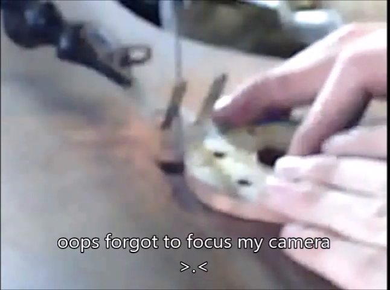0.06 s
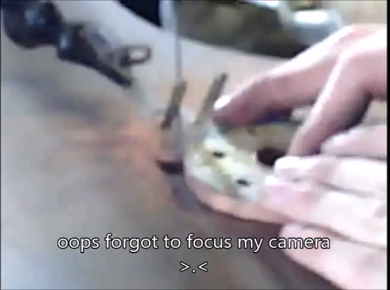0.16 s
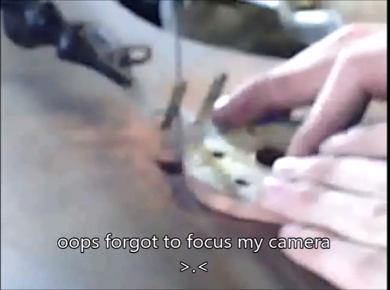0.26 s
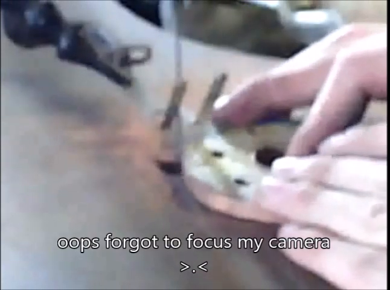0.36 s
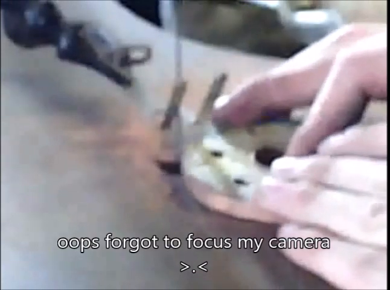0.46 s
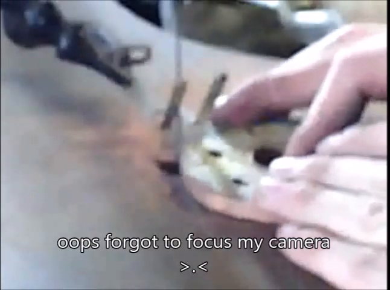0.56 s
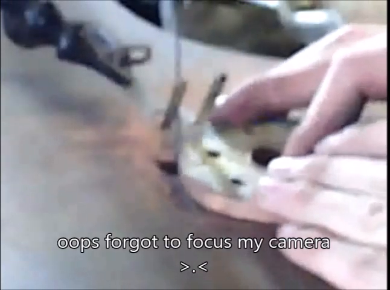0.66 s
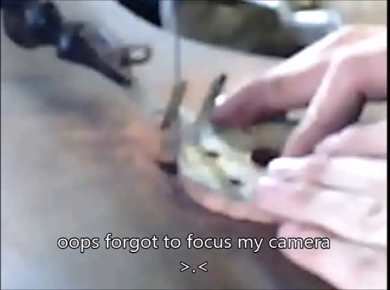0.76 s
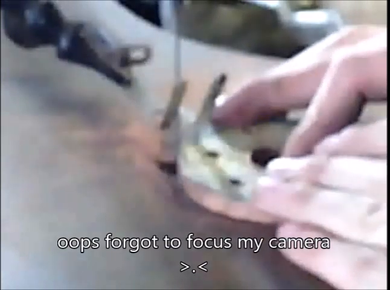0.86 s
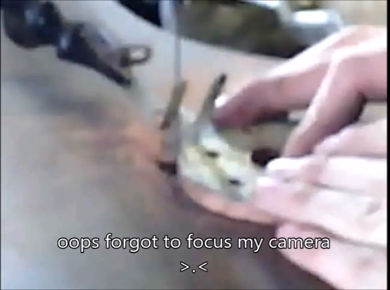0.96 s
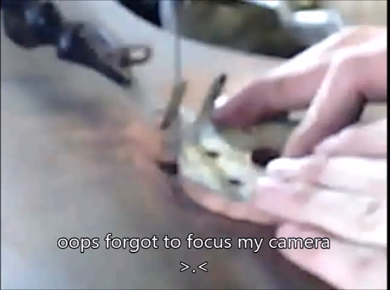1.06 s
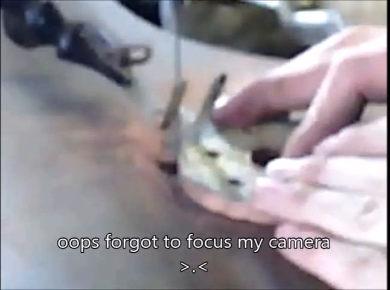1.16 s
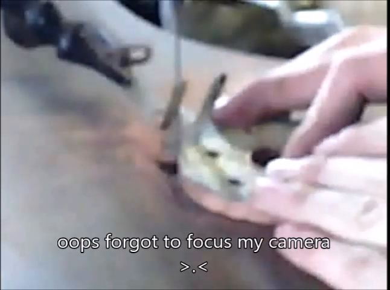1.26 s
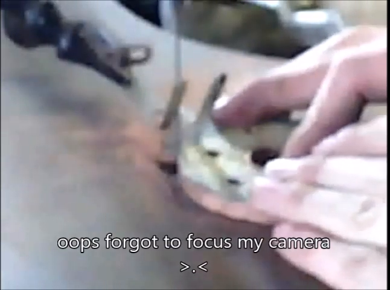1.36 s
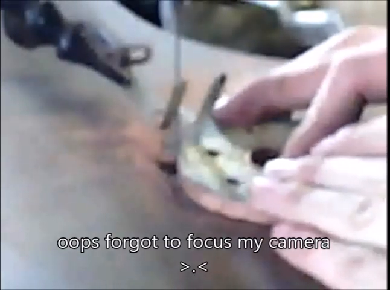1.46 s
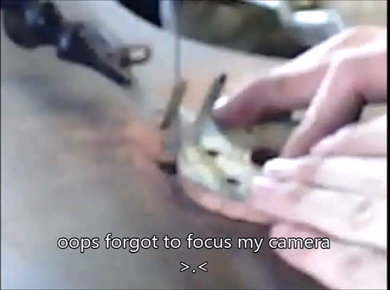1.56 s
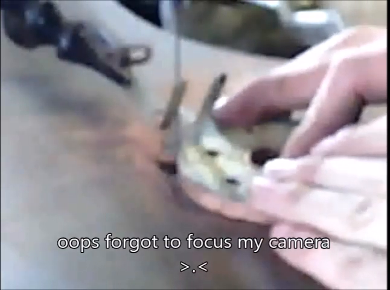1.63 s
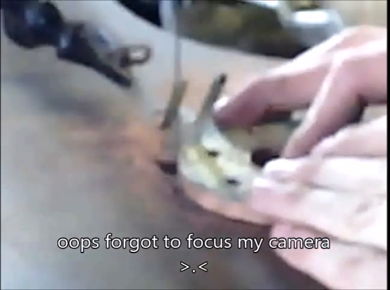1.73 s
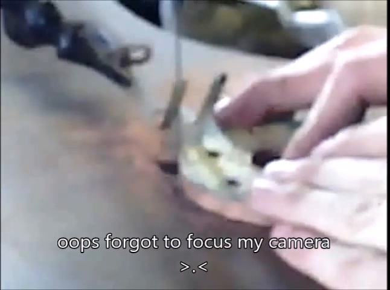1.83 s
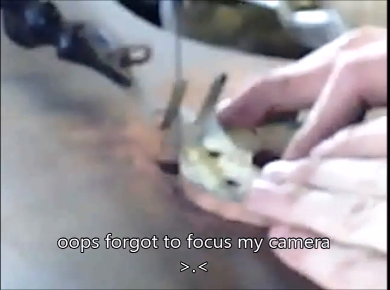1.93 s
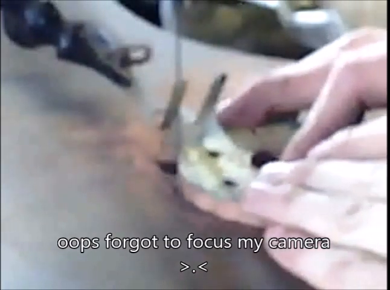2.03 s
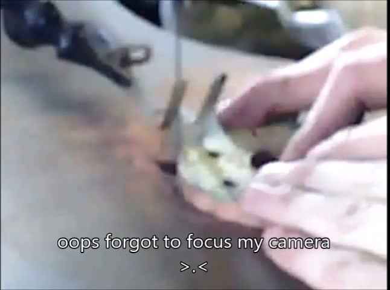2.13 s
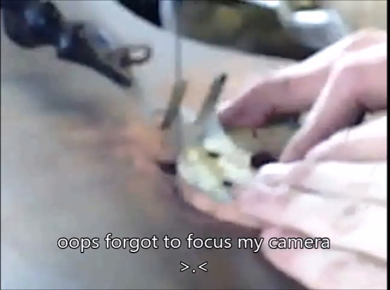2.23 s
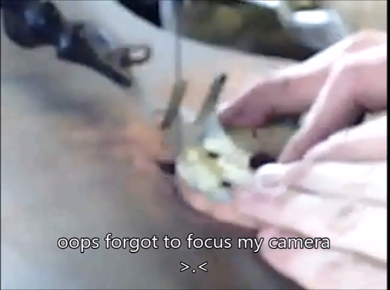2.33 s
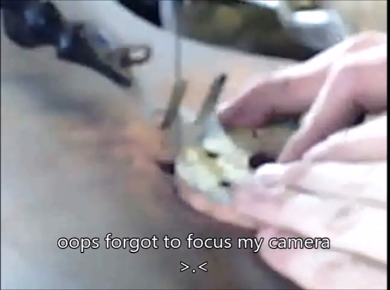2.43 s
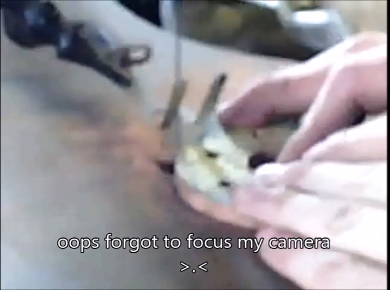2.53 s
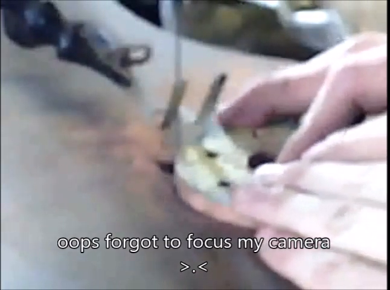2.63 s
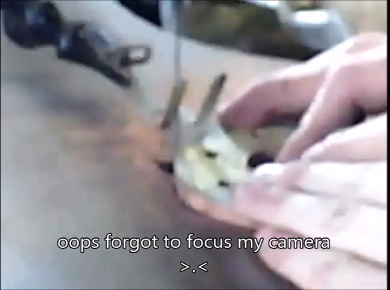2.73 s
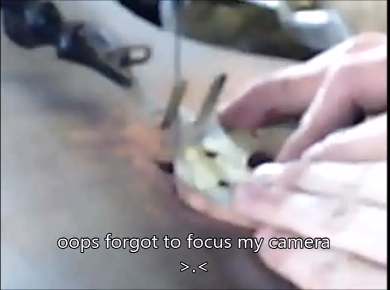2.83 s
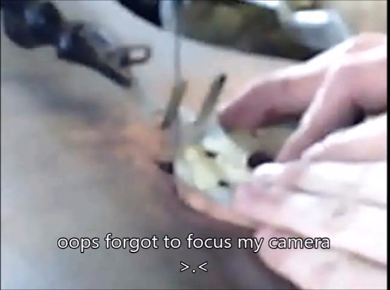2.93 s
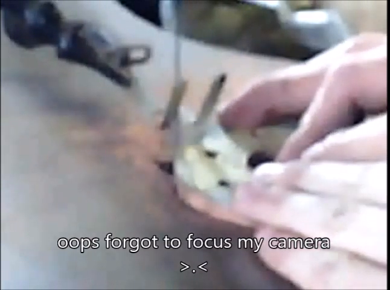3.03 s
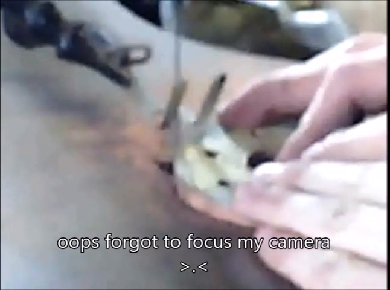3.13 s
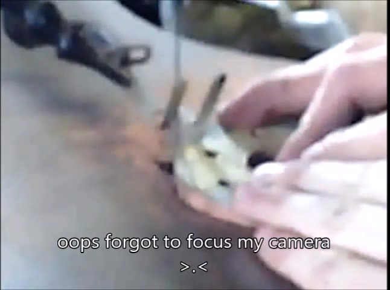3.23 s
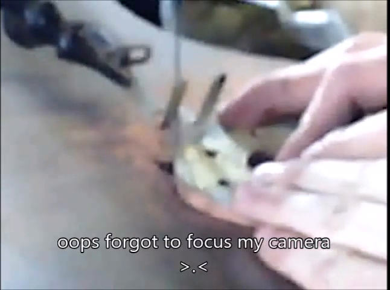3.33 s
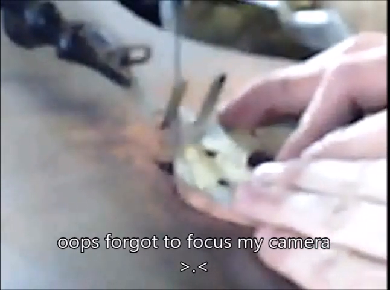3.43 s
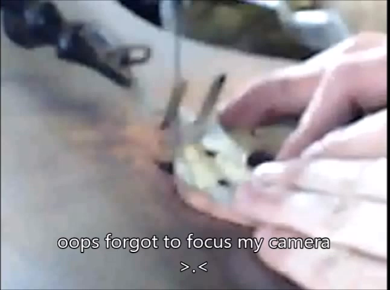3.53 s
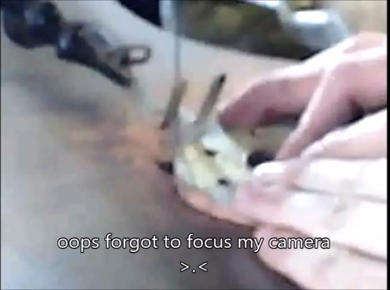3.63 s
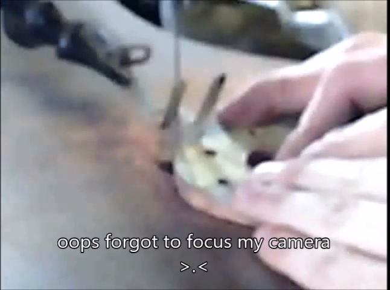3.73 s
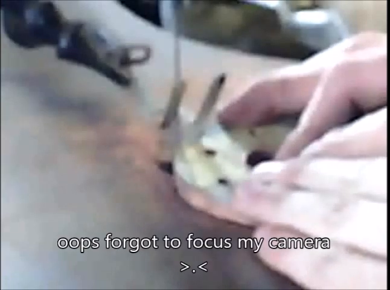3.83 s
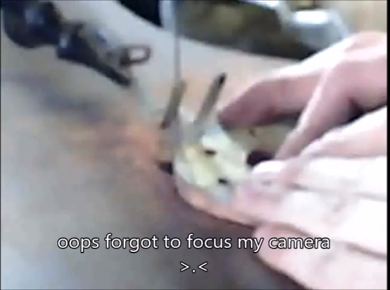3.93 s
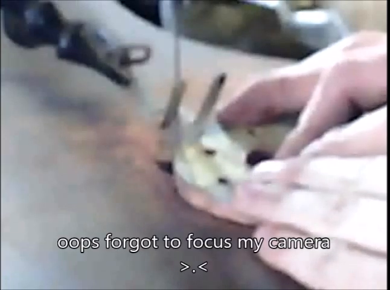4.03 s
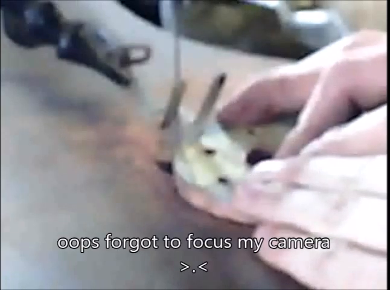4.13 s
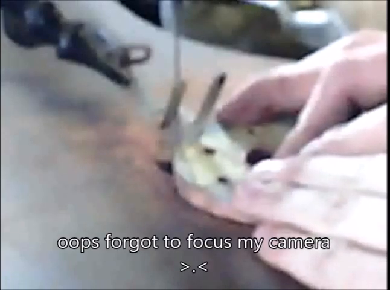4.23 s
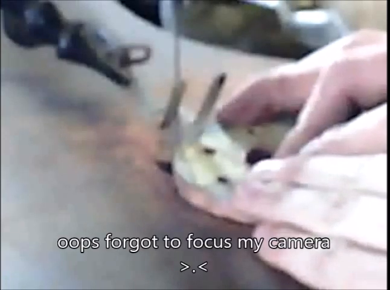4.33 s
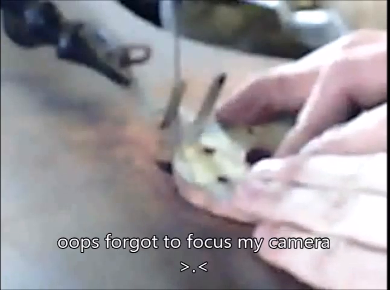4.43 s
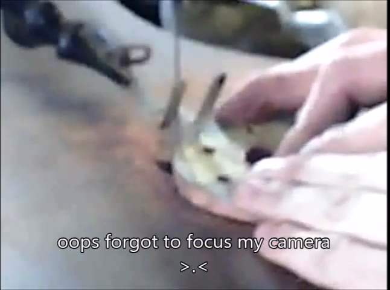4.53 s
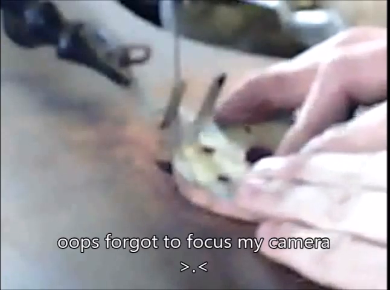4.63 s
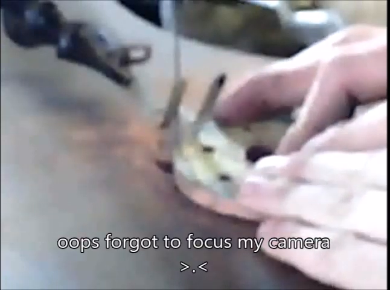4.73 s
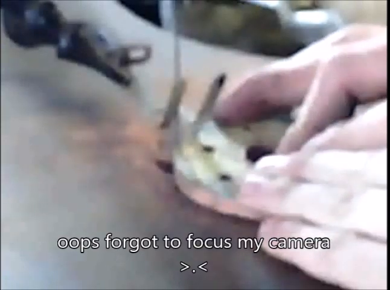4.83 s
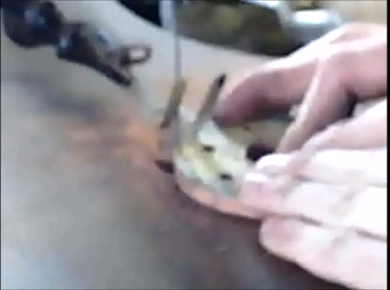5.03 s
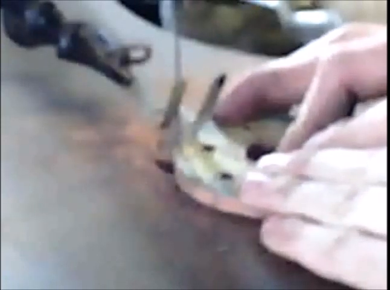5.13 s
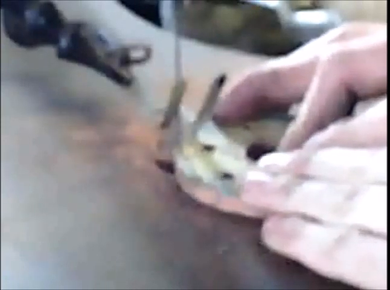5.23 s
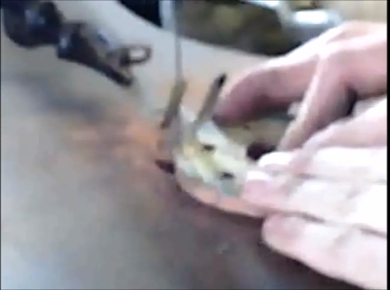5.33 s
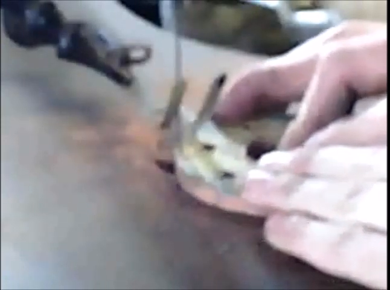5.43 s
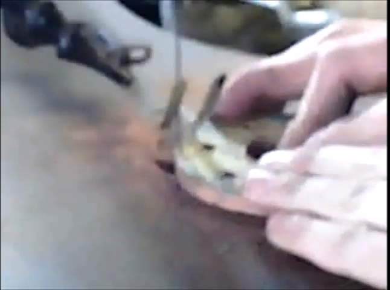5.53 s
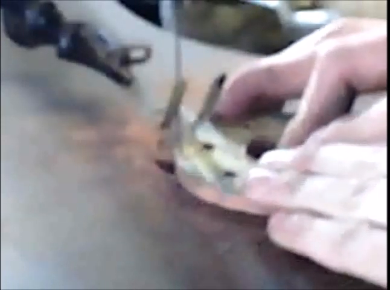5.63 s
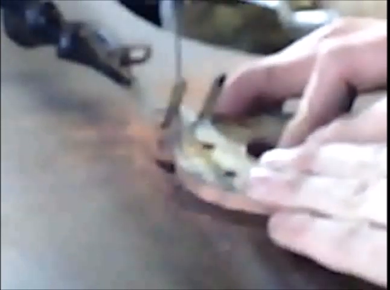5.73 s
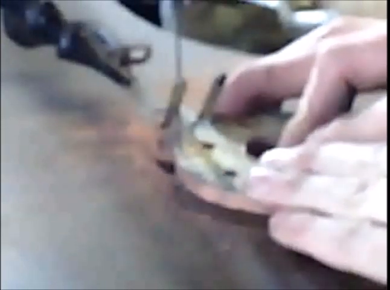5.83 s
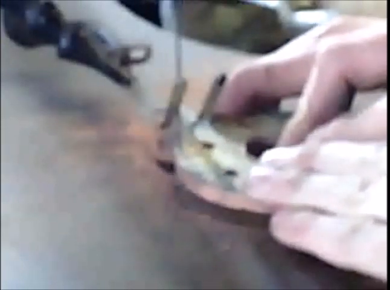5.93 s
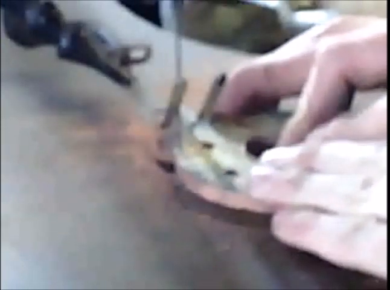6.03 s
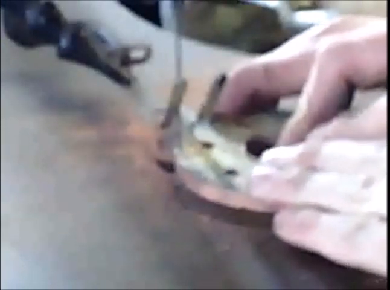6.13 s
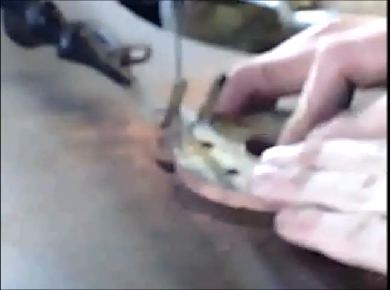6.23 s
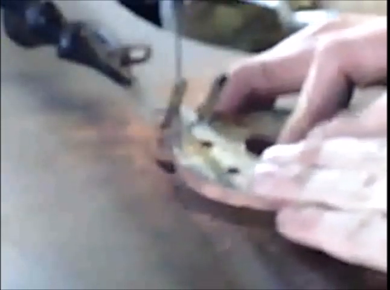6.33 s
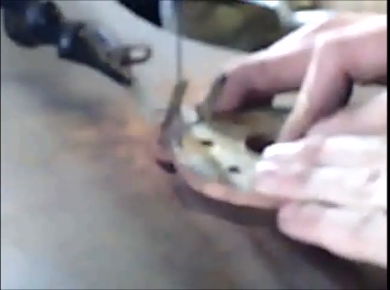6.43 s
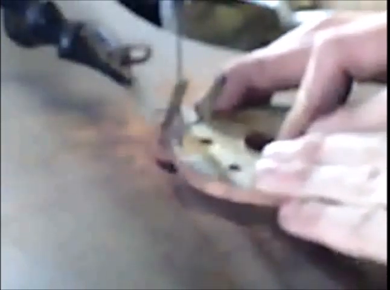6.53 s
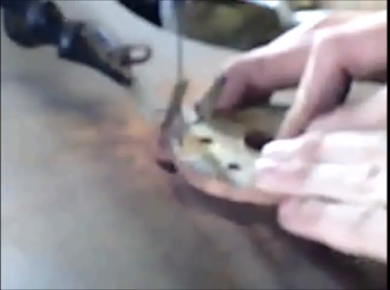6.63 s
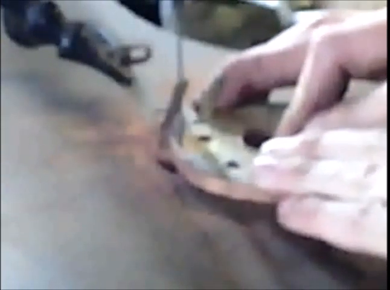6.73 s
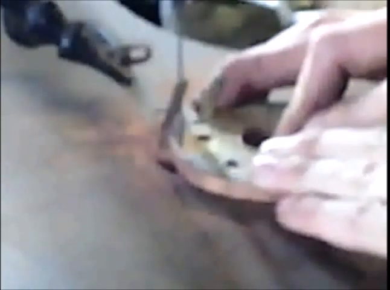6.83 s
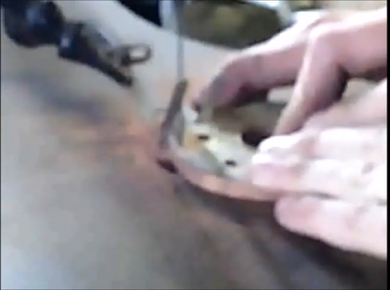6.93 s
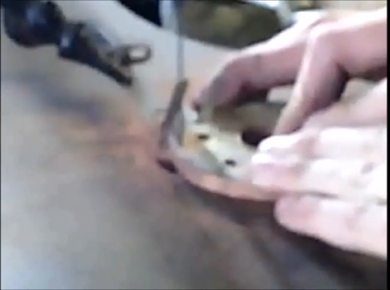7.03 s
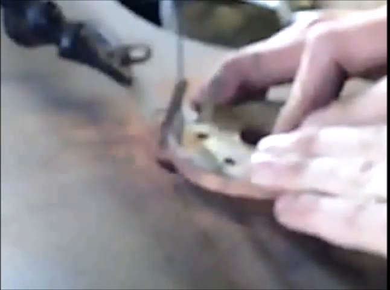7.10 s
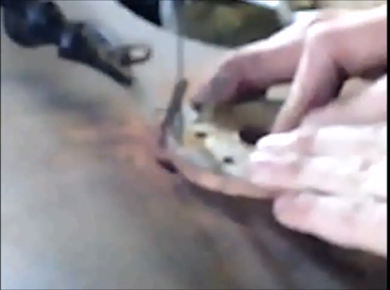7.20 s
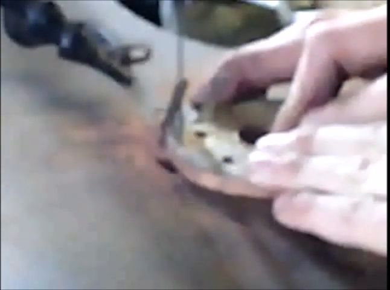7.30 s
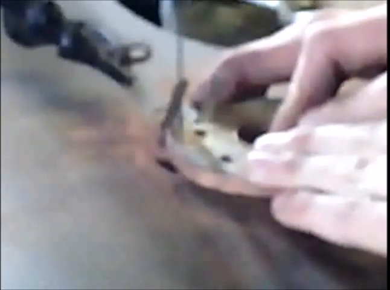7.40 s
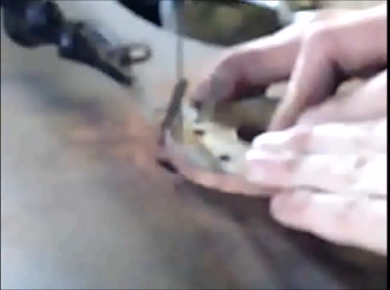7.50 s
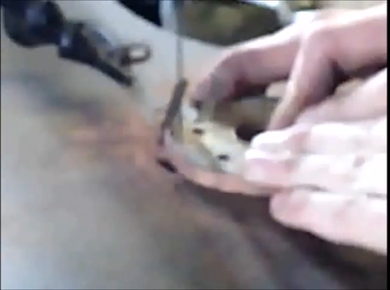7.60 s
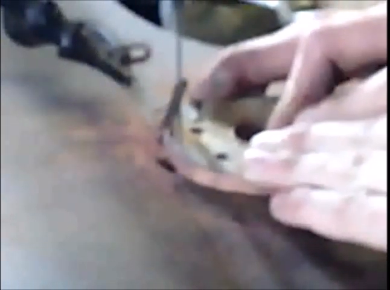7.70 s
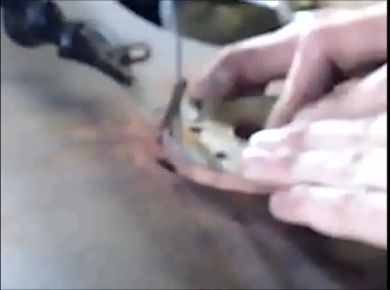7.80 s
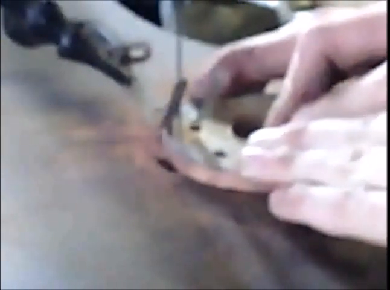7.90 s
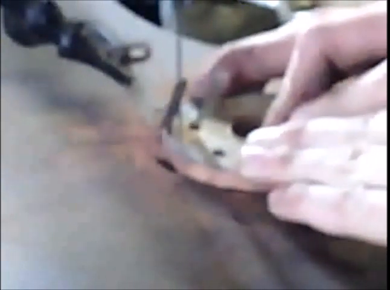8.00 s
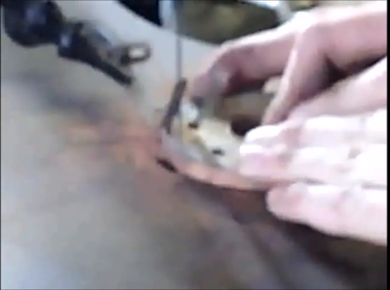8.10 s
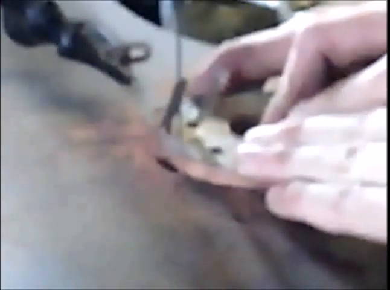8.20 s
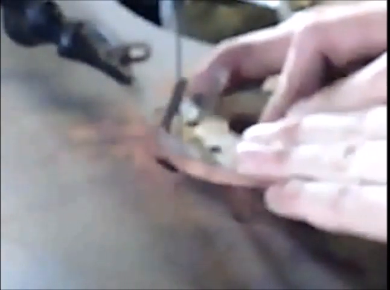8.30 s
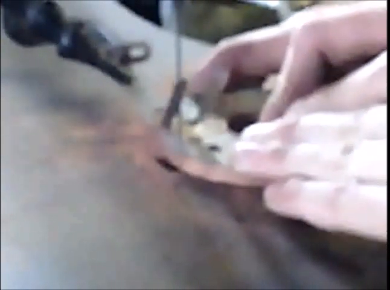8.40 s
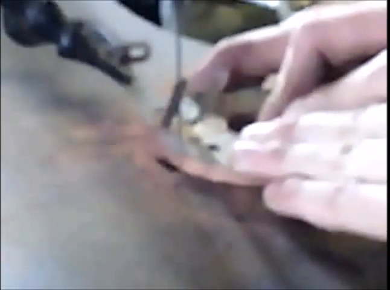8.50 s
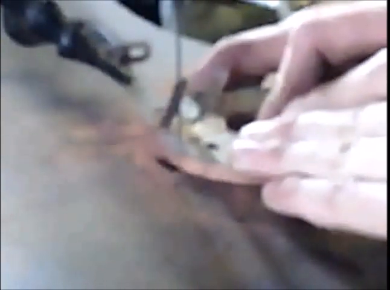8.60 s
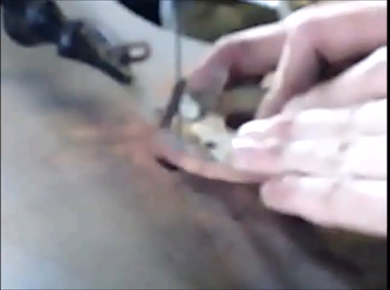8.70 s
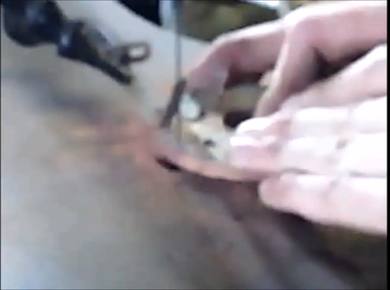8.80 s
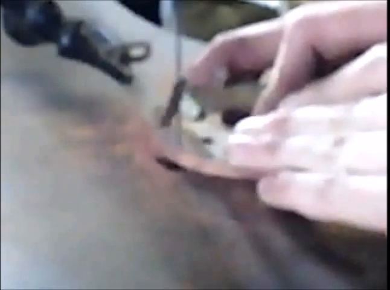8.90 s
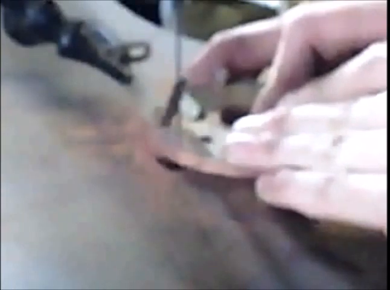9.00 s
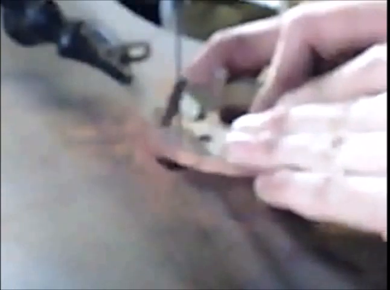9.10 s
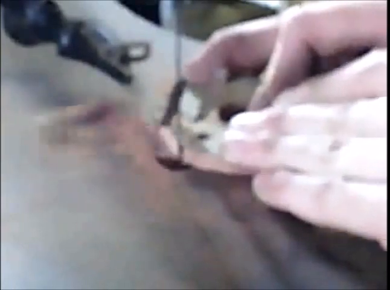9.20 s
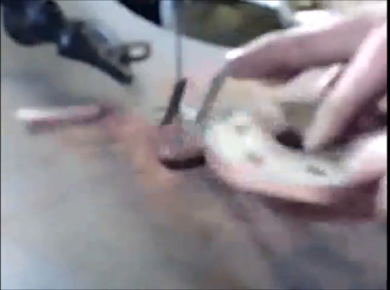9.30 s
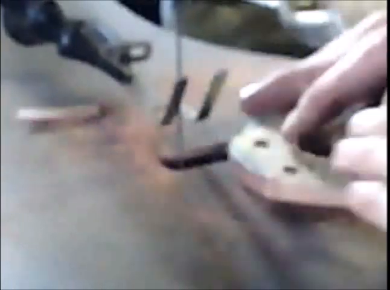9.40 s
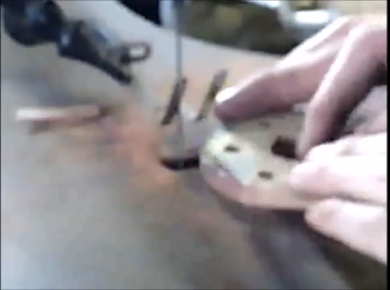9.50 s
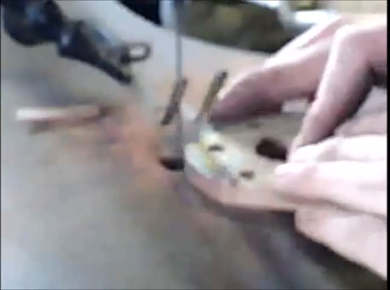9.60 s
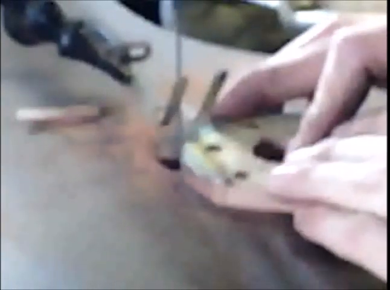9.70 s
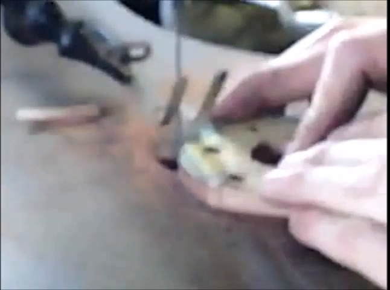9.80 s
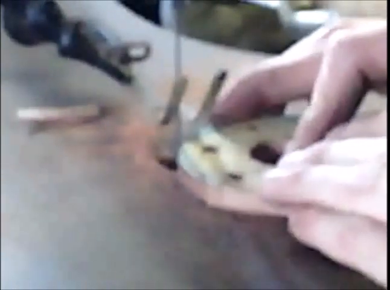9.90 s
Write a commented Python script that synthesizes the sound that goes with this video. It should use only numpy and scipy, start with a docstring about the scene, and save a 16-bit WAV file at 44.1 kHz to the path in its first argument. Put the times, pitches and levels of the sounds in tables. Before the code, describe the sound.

Close, dry mono workshop sound with faint low rumble and little deep bass. From 0 to 0.7 s a scroll saw idles: a fast metallic rattle and hum, about 26 strokes a second. At 0.7 s wood touches the blade; sharp cracks, chatter and a groaning squeak lead into a harsh, bright, pulsing rasp by 1.2 s, with a strong snag near 1.45 s. Cutting lets go around 2.0 s, lightly resumes at 2.15 and firms up at 2.5 s. The long rasp continues, with groans around 3.1 s, a clear squeak at 4.6 s, gradually easing. At about 6.4 s it abruptly becomes fast-forward: stroke rate and resonances four times higher, a thin shrill buzzing whine with hissy rasp and tiny dropouts. At 9.25 s cutting stops; the loose blade whistles and idles rapidly. At 9.8 s cutting returns with a tiny squeak, running to 10 s.

```python
"""Scroll saw, close up

The saw idles, then wood is fed into the blade, snags, and is cut in stretches, over a low workshop rumble.
Each crank turn excites the resonances of frame and clamps; cutting adds rasp, chatter and ringing of the blade.
From about 6.4 s time runs fast-forward: stroke rate and all the saw's resonances are four times higher.
Sources are tones or noise locked to the crank, mostly filtered by resonances; brief dips leave the strongest tones."""
import sys
import numpy as np
from scipy import signal
from scipy.fft import rfft, irfft, next_fast_len
from scipy.io import wavfile
from scipy.ndimage import uniform_filter1d, map_coordinates

SR = 44100
rng = np.random.default_rng(int(sys.argv[2]) if len(sys.argv) > 2 else 0)


def persist_wave(psi):
    """Save psi, clipped to +-1, as 16-bit WAV."""
    counts = np.round(np.clip(psi, -1, 1) * 32767).astype(np.int16)
    wavfile.write(sys.argv[1], SR, np.atleast_2d(counts).T)


N = 438794

JUMP_S, FAST = 6.383, 4  # start of the fast-forward, its time factor
TOP_HZ = 15800  # band limit

# resonances of the teeth, at speed 1: resonance_hz, width_hz, relative level_db
TEETH = [(5225, 440, 0.85), (5655, 38, 7.1), (6090, 63, 4), (6940, 430, 5.1)]
# resonances of the tooth tips: resonance_hz, width_hz, relative level_db
TIPS = [(7880, 76, 4.5), (8480, 84, 5), (8870, 76, 1), (8200, 54, 8), (9380, 90, -7.5)]
# the table drums more as the wood is pressed flat on it: time_s, level_db
PRESS = [(.7, -57), (1.1, -49.5), (3.3, -48.5), (3.7, -46), (9.24, -44), (9.33, -47)]
# the wood meets the blade: start_s, end_s, firmness (0-1)
CUTS = [(.72, 1.975, 1), (2.14, 2.47, .55), (2.47, 9.24, 1), (9.77, 10, 1)]


def machine(t, speed, frame_db, knock_db, clamp_db, motor_db):
    """Forced vibration: the motor hums, the arm shakes the frame and knocks at its ends, and the clamps rattle."""
    # resonances at speed 1: resonance_hz, width_hz, relative level_db
    frame_modes = [(80, 5.1, -18), (104, 8.4, -9.5), (134, 20, -11.5), (243, 20, -2), (310, 15, -3),
                   (352, 25, -2.5), (520.6, 17.3, 4), (646, 18, 3), (755, 56, -2), (838, 61, -1),
                   (982, 31, -2.5)]
    # likewise: resonance_hz, width_hz, relative level_db
    clamp_modes = [(1290, 33, -10), (1560, 54, -11), (1980, 17, -11.5), (2218, 42, -7), (2380, 28, -8.5),
                   (2527, 95, -9.5), (3055, 47, -6), (5100, 290, -9), (5690, 74, -3.5), (6216, 123, 0.5),
                   (6400, 280, -4), (9330, 90, -5.5), (12600, 500, -26)]
    # likewise: resonance_hz, width_hz, relative level_db
    arm_modes = [(585.5, 25, 0), (530, 16, -7)]
    # broad rattle between the clamp resonances, at speed 1: frequency_hz, relative density_db
    rattle_noise = [(300, -59), (1000, -18.5), (3700, -29), (5500, -24), (7500, -35), (8800, -19),
                    (10700, -34), (12500, -20.5), (16000, -34)]
    turns = crank(t)
    phase_waver = .25 * wobble(t, 3 * speed) + .18 * wobble(t, 14 * speed)
    motor = np.sin(2 * np.pi * 6 * turns + phase_waver)
    shake = repeating(turns + .01 * wobble(t, 8 * speed), loose=.22, centre=.2, spread=.28)
    # both ends of the arm's travel
    ends = lobe(turns, centre=.68, width=.05) + .8 * lobe(turns, centre=.05, width=.05)
    knock = repeating(turns + .008 * wobble(t, 8 * speed), loose=.28) * ends
    slap = 1 + 0.92 * lobe(turns, centre=0.443, width=0.055) + 0.37 * lobe(turns, centre=0.63, width=0.07)
    rattle = repeating(turns, loose=0.45) * slap
    # pressing the wood flat raises the hum and damps the knock
    press = curves(PRESS, t)[0] - PRESS[-1][1]
    hum = amp(motor_db + .5 * press + 1.6 * wobble(t, 6 * speed)) * motor
    arm = amp(knock_db - 0.33 * press) * body(knock, arm_modes, speed=speed)
    frame = amp(frame_db) * body(shake, frame_modes, speed=speed)
    clamps = amp(clamp_db) * body(rattle, clamp_modes, rattle_noise, speed)
    return hum + arm + frame + clamps


def cutting(t, speed, stretches, rasp_db, chatter_db, ring_db, ring_grows):
    """Modulated noise excites resonances: teeth rasp on both strokes, the lifted wood chatters, the blade rings."""
    # resonances at speed 1: resonance_hz, width_hz, relative level_db
    wood_modes = [(907, 22, -14.5), (1292, 34, -8.5), (1340, 100, -15), (1487, 30, -3.5), (1557, 30, 0),
                  (1675, 36, -13)]
    # likewise: resonance_hz, width_hz, relative level_db
    blade_modes = [(2345, 22, -3), (3075, 22, -7), (3300, 85, 0), (3650, 22, -5), (3800, 110, -12),
                   (3925, 20, -7)]
    # broad noise between the tooth resonances, at speed 1: frequency_hz, relative density_db
    sawdust_noise = [(200, -27), (320, -33), (600, -10.5), (1000, -8), (1900, -13.5), (2600, -8),
                     (4500, -8), (7300, -4.5), (9300, -2.5), (10500, -17), (13000, -19.5), (16000, -42)]
    # the teeth tear out fibres and rasp louder for a moment: peak_s, length_s, added level_db
    tears = [(0.927, 0.35, 8.5), (6.606, 0.034, 8.5), (6.803, 0.28, 5.5), (7.214, 0.075, 3),
             (8.833, 0.027, 7), (9.047, 0.22, 4)]
    rasp_grows = 0.33  # dB per dB of feed
    stroke_scatter_db = 1
    turns = crank(t)
    feed, chatter = feeding(t, stretches)
    tearing = sum(db * swell(t, s, length) for s, length, db in tears)

    strokes = .29 + lobe(turns, centre=.18, width=.11) + lobe(turns, centre=.74, width=.11)
    fibre_db = 3.6 * np.tanh(wobble(t, 900 * speed)) + 1.1 * wobble(t, 40 * speed)
    fibres = repeating(turns, loose=.68) * amp(fibre_db)
    teeth = body(fibres * strokes, TEETH, sawdust_noise, speed)

    lift = .35 + lobe(turns, centre=.92, width=.08) + .5 * lobe(turns, centre=.2, width=.1)
    lift *= amp(stroke_scatter_db * wobble(t, 26 * speed))
    wood = bending(body(repeating(turns, loose=0.68) * lift, wood_modes, speed=speed), t, speed)

    bow = (0.12 + lobe(turns, centre=0.1, width=0.15)) * amp(2.6 * wobble(t, 3 * speed))
    blade = body(rng.standard_normal(len(t)) * bow, blade_modes, speed=speed)

    rasp = amp(rasp_db + rasp_grows * feed + tearing) * teeth
    ring = amp(ring_db + ring_grows * feed) * blade
    return contact(t) * (rasp + amp(chatter_db + chatter) * wood + ring)


def tooth_tips(t, stretches, hiss_db):
    """Velocity-dependent friction: a bright hiss in the middle of each stroke, growing steeply with the feed."""
    tips_grow = 1.42  # dB per dB of feed
    turns = crank(t)
    strokes = 0.06 + .85 * lobe(turns, centre=0.16, width=0.075) + lobe(turns, centre=0.73, width=0.07)
    hiss = body(grit(t, 830, rough_db=4.0) * strokes, TIPS)
    return amp(hiss_db + tips_grow * feeding(t, stretches)[0]) * contact(t) * hiss


def snags(t):
    """Impulse response: a tooth catches and lets go with a sharp, decaying crack, once a turn of the crank."""
    # runs of catches: last_catch_s, strokes, peak level_db of the last, growth_db per stroke
    catches = [(.8095, 1, -9, 0), (.857, 1, -6, 0), (.9602, 3, -3, 1), (1.047, 5, -4, .8),
               (1.4491, 3, -1.5, 4.5), (1.943, 1, -10, 0), (2.569, 2, -6.5, 0), (2.838, 2, -10, -2),
               (3.405, 1, -6, 0)]
    # broad noise of a crack: frequency_hz, relative density_db
    crack_noise = [(300, -30), (3000, -16), (5500, -0.5), (8000, 8), (11000, -25), (16000, -27)]
    out, age, turns = np.zeros(len(t)), np.arange(SR // 20) / SR, crank(t)
    fade = amp(-60 * age / .021)  # excitation falls 60 dB in 21 ms
    for last, strokes, db, growth in catches:
        for before in range(strokes):
            start = np.searchsorted(turns, np.interp(last, t, turns) - before)
            crack = body(rng.standard_normal(len(age)) * fade, TEETH + TIPS[:1], crack_noise)
            out[start:][:len(age)] += amp(db - growth * before) * crack / np.abs(crack).max()
    return out


def steering(t, speed):
    """Friction-driven resonance: turning the piece twists the blade in the kerf; wood groans and steel squeaks."""
    # the wood's groans: peak_s, length_s, level_db
    groans = [(0.976, 0.54, -41.5), (1.752, 0.24, -37), (3.113, 0.85, -35), (4.782, 0.11, -39),
              (5.47, 0.29, -40.5)]
    # squeaks on the side of the kerf: peak_s, length_s, level_db, pitch_hz (at speed 1), crank place (0-1)
    squeaks = [(0.952, 0.29, -37, 3345, 0.08), (1.723, 0.69, -44, 2540, 0.4), (1.743, 0.36, -37, 3330, 0.1),
               (2.327, 0.3, -41, 2537, 0.73), (2.795, 0.36, -35.5, 3330, 0.18),
               (3.7, 0.98, -42.5, 3333, 0.11), (4.63, 0.45, -33.5, 3310, 0.18), (5.5, .7, -46, 3325, 0.28),
               (6.1, .6, -42.5, 4290, 0), (9.82, .07, -41, 2550, .5)]
    groan = sum(amp(db) * swell(t, s, length) for s, length, db in groans)
    out = rubbing(t, speed, groan, hz=1316, centre=0.22, rough=0.99)
    for s, length, db, hz, place in squeaks:
        if t[0] <= s <= t[-1]:
            out += rubbing(t, speed, amp(db) * swell(t, s, length), hz, place, rough=0.58)
    return out


def rubbing(t, speed, loudness, hz, centre, rough):
    """Stick-slip: once a turn the blade's flank gives a short, rough chirp on one resonance."""
    chirps = (0.06 + lobe(crank(t), centre, width=0.11)) * amp(1.8 * wobble(t, 60 * speed))
    roughness = rough * wobble(t, 200 * speed) + 3 * wobble(t, 25 * speed)
    return loudness * unit(chirps * np.sin(2 * np.pi * hz * speed * t + roughness))


def freed_blade(t):
    """Harmonic excitation: while the motor races after a cut, the loose blade sings on stroke-rate multiples."""
    # tones of the whistle: multiple of the stroke rate, level_db
    whistle = [(6, -53), (10, -56), (11, -52), (13, -55), (20, -54), (22, -50), (31, -42), (35, -51)]
    lag_s = .025  # whistle after the end of the cut
    racing, turns = sum(lurch(t, end + lag_s) for start, end, firm in CUTS), crank(t)
    return racing * sum(amp(db + 2.5 * wobble(t, 66)) * np.sin(2 * np.pi * k * turns) for k, db in whistle)


def drumming(t, speed, drum_db, hum_db):
    """Imbalance forcing: the crank drives the table in wavering tones over a loose drumming."""
    # resonances of the table at speed 1: resonance_hz, width_hz, relative level_db
    table_modes = [(262, 56, -12), (292, 78, -6), (423, 11, -10), (556, 45, -9.5), (750, 56, -10.5),
                   (884, 77, -6)]
    # tones locked to the crank, some to every second turn: multiple of the stroke rate, relative level_db
    crank_tones = [(9, -13), (10, -7), (10.5, -13), (11, -3.5), (11.5, -9.5), (12, -18), (20, -16),
                   (21, -11), (21.5, -9.5), (22, -8.5), (34, -5)]
    turns = crank(t)
    waver = .09 * wobble(t, 4 * speed)
    hum = np.zeros(len(t))
    for k, db in crank_tones:
        tone = np.sin(2 * np.pi * (k * turns + rng.random()) + k * waver)
        hum += amp(db + 2.5 * wobble(t, 5 * speed)) * tone
    table = body(grit(t, 25 * speed, rough_db=3.5), table_modes, speed=speed)
    return amp(curves(PRESS, t)[0]) * (amp(drum_db) * table + amp(hum_db) * hum)


def workshop():
    """Broadband ambience: stationary noise weighted to the bass makes the workshop's low rumble."""
    # spectrum of the rumble: frequency_hz, relative density_db
    shop_noise = [(20, 0), (70, -15), (135, -22), (260, -14), (1000, -12), (16000, -53)]
    return amp(-69) * body(rng.standard_normal(N), broad=shop_noise)


def bench(x, speed, wet_db=-14, t60=0.11):
    """Reflection and radiation: near surfaces echo the treble and cancel a low band; a small saw lacks deep bass."""
    age = np.arange(SR // 10) * speed / SR  # t60 in s at speed 1
    treble = signal.butter(2, 900 * speed, "high", fs=SR, output="sos")
    tail = signal.sosfilt(treble, rng.standard_normal(len(age)))
    tail = tail * amp(-60 * age / t60)
    x = signal.lfilter(*signal.iirnotch(198 * speed, 5, fs=SR), x)
    x = signal.sosfilt(signal.butter(3, 65 * speed, "high", fs=SR, output="sos"), x)
    return x + amp(wet_db) * signal.fftconvolve(x, tail / np.linalg.norm(tail))[:len(x)]


def dips(x, size=1024):
    """Spectral gating: in each brief dip the noise drops away; tones that stand over their neighbours hold."""
    # dips of the noise: centre_s, depth_db
    thinned = [(.95, 10), (2.06, 14), (3.104, 14), (3.645, 8), (4.855, 10), (4.915, 12), (5.51, 12),
               (5.62, 8), (6.506, 36), (6.56, 11), (6.625, 12), (6.944, 12), (7.03, 13), (7.433, 13),
               (7.563, 10), (7.648, 12), (7.69, 12), (7.753, 10), (7.84, 13), (7.903, 13), (8.33, 15),
               (8.71, 8), (8.864, 11), (9.272, 11), (9.738, 10)]
    length_s, hold_db = .018, 8  # length of a dip, how far a tone stands out
    t = np.arange(N) / SR
    gain = amp(-sum(db * swell(t, s, length_s) for s, db in thinned))
    z = signal.stft(x, nperseg=size)[2]
    stands_out = np.abs(z) > amp(hold_db) * uniform_filter1d(np.abs(z), size=41, axis=0)
    tones = signal.istft(z * stands_out, nperseg=size)[1][:N]
    return gain * x + (1 - gain) * tones


def crank(t):
    """Phase as the integral of rate: turns of the crank at the times t, with drift and changes of load."""
    # drift of the motor's speed, before load and fast-forward: time_s, rate in strokes per second
    stroke_drift = [(0.0, 26.94), (0.7, 26.8), (1.25, 26.73), (1.7, 26.24), (2.1, 26.37), (2.45, 26.63),
                    (2.8, 25.61), (3.25, 26.67), (3.6, 26.52), (4.2, 26.37), (4.65, 26.65), (5.3, 26.62),
                    (5.7, 26.89), (6.05, 26.41), (6.38, 27.1), (6.6, 26.23), (6.85, 26.75), (7.05, 26.79),
                    (7.3, 26.74), (7.7, 26.66), (8.2, 26.65), (8.6, 26.7), (9.25, 26.5), (9.37, 27.35),
                    (9.48, 26.44), (9.66, 26.78), (9.8, 26.74), (9.95, 27.0)]
    sag, race = .468, 1.288  # strokes per second lost as a firm cut begins, gained as it ends
    step = .002  # s
    clock = np.arange(0, N / SR + step, step)
    rate = curves(stroke_drift, clock)[0]
    for start, end, firm in CUTS:
        rate = rate + firm * (race * lurch(clock, end) - sag * lurch(clock, start))
    return np.interp(t, clock + step, np.cumsum(rate * time_rate(clock)) * step)


def lurch(t, s):
    """Feedback control: the motor's answer to a load change at s grows to 1, then the governor pulls it back."""
    governor_s = .238  # time to the peak, before any fast-forward
    age = np.maximum(t - s, 0) * time_rate(t) / governor_s
    return (age * np.exp(1 - age)) ** 2


def time_rate(t):
    """Time scaling: the factor by which time runs faster at the times t."""
    return np.where(t < JUMP_S, 1, FAST)


def contact(t):
    """Contact coupling: how firmly the wood meets the blade, 0-1, with linear ramps."""
    meet_s, part_s = 0.07, 0.06  # time to make and to lose contact
    firmness = 0
    for start, end, firm in CUTS:
        firmness = firmness + firm * (np.clip((t - start) / meet_s, 0, 1) - np.clip((t - end) / part_s, 0, 1))
    return firmness


def feeding(t, stretches):
    """Driving force: feed in dB above the usual, and chatter in dB, along successive stretches."""
    usual_feed_db = -27
    feed, chatter = curves(np.concatenate(stretches), t)
    return feed - usual_feed_db, chatter


def bending(x, t, speed):
    """Doppler principle: a varying delay makes the pitch wander, as grip and tension shift the resonances."""
    share, rate = .0035, 7 * speed  # share of the pitch, shifts a second
    delay = share / rate * map_coordinates(rng.standard_normal(int(N / SR * rate) + 4), [t * rate])
    return map_coordinates(x, [np.arange(len(x)) + delay * SR], mode="mirror")


def body(x, modes=(), broad=None, speed=1):
    """Source-filter principle: x rung through resonances and a broad spectrum, raised by speed; rms 1."""
    size = 2 * next_fast_len(len(x) // 2 + 4096)
    f = np.fft.rfftfreq(size, 1 / SR) / speed + 1
    power = np.full(len(f), 1e-9)
    for hz, width, db in modes:
        power += amp(db) ** 2 / (1 + ((hz * hz - f * f) / (f * width)) ** 2)
    if broad is not None:
        hz, db = np.transpose(broad)
        power += amp(np.interp(np.log(f), np.log(hz), db)) ** 2
    # minimum phase: the ringing follows the blow
    cepstrum = irfft(np.log(power))[:size // 2]
    cepstrum[0] /= 2
    response = np.exp(rfft(cepstrum, size))
    return unit(irfft(rfft(x, size) * response)[:len(x)])


def repeating(turns, loose, centre=0, spread=1, size=4096):
    """Periodic excitation: noise recurring at every turn, spread round a centre; a loose share never repeats."""
    harmonics = int(TOP_HZ / SR / np.diff(turns).mean())
    # each harmonic's group delay, in turns
    delays = centre + spread * rng.standard_normal(harmonics)
    cycle = unit(irfft(np.exp(-2j * np.pi * np.cumsum(delays)), size))
    same = map_coordinates(cycle, [turns % 1 * size], order=1, mode="grid-wrap")
    return np.sqrt(1 - loose) * same + np.sqrt(loose) * rng.standard_normal(len(turns))


def grit(t, rate, rough_db):
    """Amplitude modulation: noise in clumps of uneven strength, about rate a second."""
    return rng.standard_normal(len(t)) * amp(rough_db * np.tanh(wobble(t, rate)))


def lobe(turns, centre, width, skew=0.55):
    """Cyclic envelope: a swell once a turn that rises faster than it falls; centre and width in turns."""
    angle = 2 * np.pi * (turns - centre)
    spread = 2 * np.pi * width * (1 + skew * np.sin(angle))
    return np.exp((np.cos(angle) - 1) / spread ** 2)


def swell(t, centre, length):
    """Gaussian envelope: a smooth rise to 1 and fall; centre and length (between 1/e points) in seconds."""
    return np.exp(-(2 * (t - centre) / length) ** 2)


def wobble(t, rate):
    """Band-limited fluctuation: a smooth random curve, rate knots a second."""
    at = (t - t[0]) * rate
    coarse = np.linspace(0, at[-1], int(at[-1] + 2) * 8)
    knots = rng.standard_normal(int(at[-1]) + 4)
    return np.interp(at, coarse, map_coordinates(knots, [coarse], order=2))


def curves(rows, t):
    """Linear interpolation: each column after the time, read at the times t."""
    s, *cols = np.transpose(rows)
    return [np.interp(t, s, c) for c in cols]


def amp(db):
    """Decibel law: level in dB to amplitude."""
    return 10 ** (np.asarray(db) / 20)


def unit(x):
    """Power normalisation: x scaled to rms 1."""
    return x / np.sqrt(np.mean(x ** 2) + 1e-20)


def scene():
    """Superposition: the saw at normal speed, then in fast-forward, over the workshop's low rumble."""
    # feed of the hand and chatter of the wood in each stretch: time_s, feed_db, chatter_db
    first_cut = [(0.79, -35.5, -31.5), (0.95, -39.5, -25.5), (1.2, -24, -31), (1.45, -23, -30.5),
                 (1.68, -25.5, -26), (1.9, -25.5, -21)]
    # likewise: time_s, feed_db, chatter_db
    long_cut = [(2.2, -23, -24), (2.42, -24.5, -28.5), (2.55, -24.5, -28), (3.25, -23.5, -26.5),
                (3.5, -23, -30.5), (3.8, -21, -26), (3.98, -23.5, -31), (4.5, -24.5, -38.5),
                (4.78, -26, -31.5), (5.22, -27.5, -36.5), (5.5, -27, -30), (5.67, -26.5, -36.5),
                (5.88, -28, -28), (6.1, -28, -35), (6.3, -30, -31)]
    # likewise: time_s, feed_db, chatter_db
    fast_cut = [(6.44, -40, -33.5), (6.8, -37, -35.5), (7.08, -41, -37.5), (7.22, -37, -33),
                (7.33, -40, -40), (7.5, -36.5, -35), (7.98, -34, -35), (8.22, -37, -33.5),
                (8.4, -37.5, -33.5), (8.8, -32.5, -35), (9.2, -33.5, -33.5)]
    # likewise: time_s, feed_db, chatter_db
    last_cut = [(9.8, -55, -31.5), (9.91, -40, -28.5)]
    t = np.arange(N) / SR
    early, late = t[t < JUMP_S], t[t >= JUMP_S]

    normal = machine(early, 0.98, frame_db=-45.0, knock_db=-47.5, clamp_db=-34.5, motor_db=-56.5)
    normal += cutting(early, 0.99, [first_cut, long_cut], rasp_db=-27.5, chatter_db=-3,
                      ring_db=-39, ring_grows=0.074)
    normal += tooth_tips(early, [first_cut, long_cut], hiss_db=-32.5)
    normal += snags(early) + steering(early, 1)
    normal += drumming(early, 1, drum_db=0, hum_db=0.5)

    fast = machine(late, FAST, frame_db=-46.0, knock_db=-48.5, clamp_db=-43.5, motor_db=-54.5)
    fast += cutting(late, FAST, [fast_cut, last_cut], rasp_db=-32.0, chatter_db=-4.5,
                    ring_db=-26.5, ring_grows=0.8)
    fast += steering(late, FAST) + freed_blade(late)
    fast += drumming(late, FAST, drum_db=-4, hum_db=1)

    saw = np.concatenate([bench(normal, 1), bench(fast, FAST)])
    return dips(saw) + workshop()


def record(dry):
    """Band limitation: one channel, with nothing from TOP_HZ up."""
    in_band = np.fft.rfftfreq(N, 1 / SR) < TOP_HZ
    return irfft(rfft(dry) * in_band, N).reshape(1, N)


dry = scene()
out = record(dry)
persist_wave(out)
```